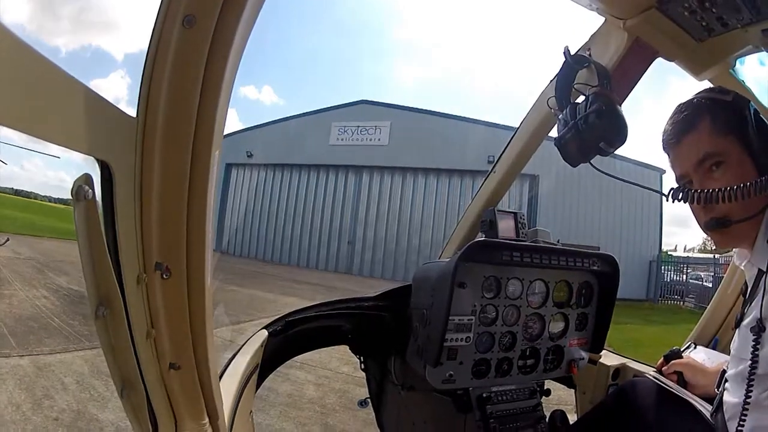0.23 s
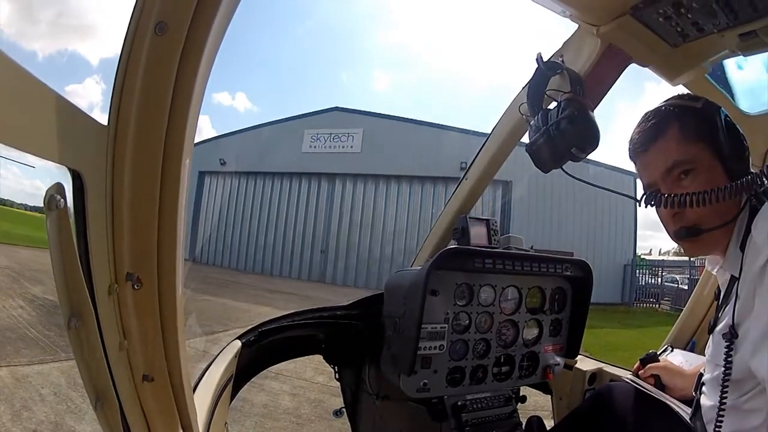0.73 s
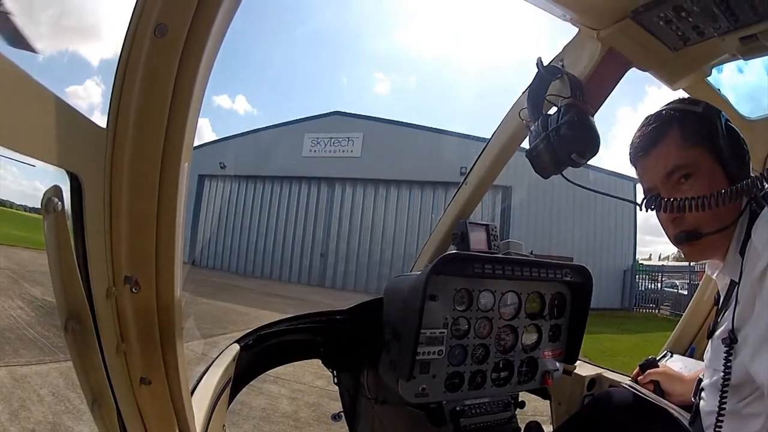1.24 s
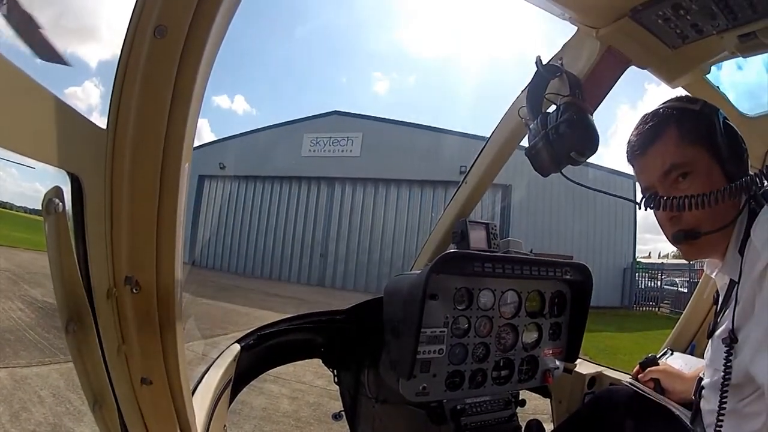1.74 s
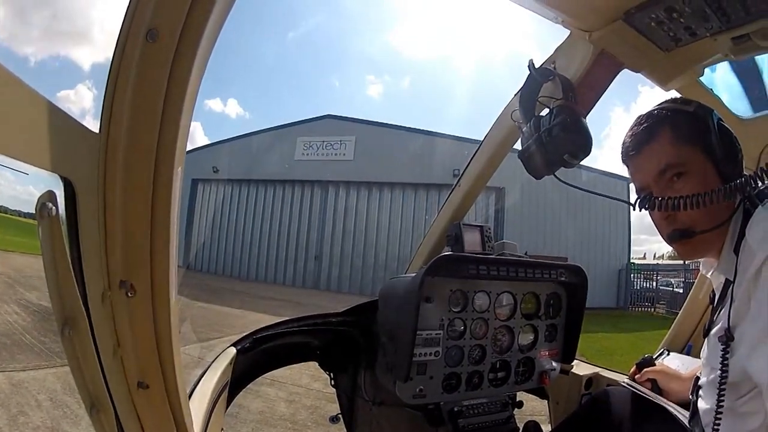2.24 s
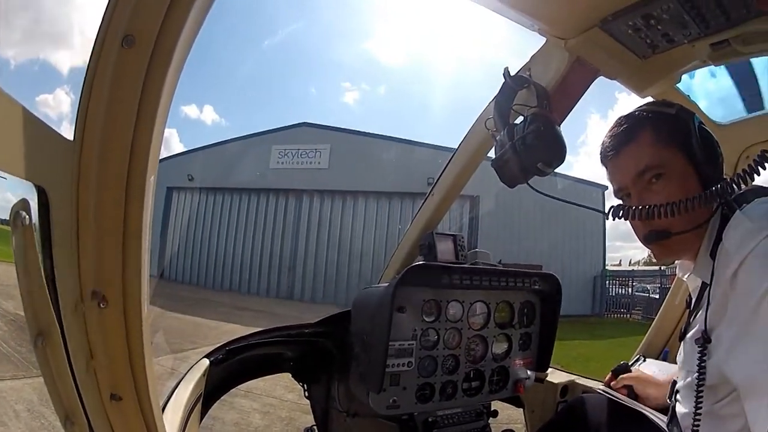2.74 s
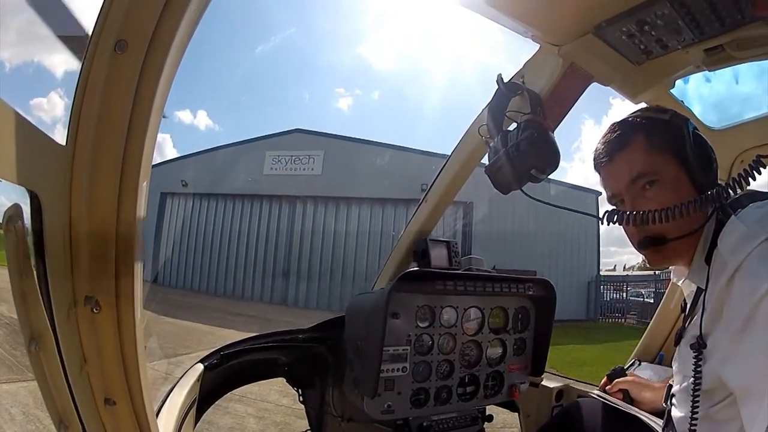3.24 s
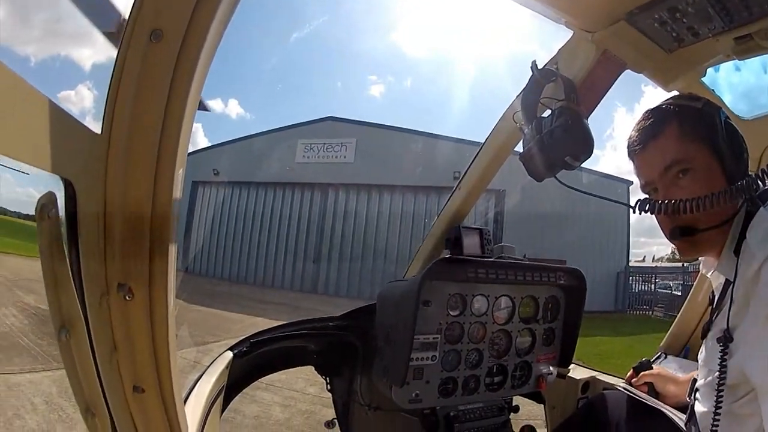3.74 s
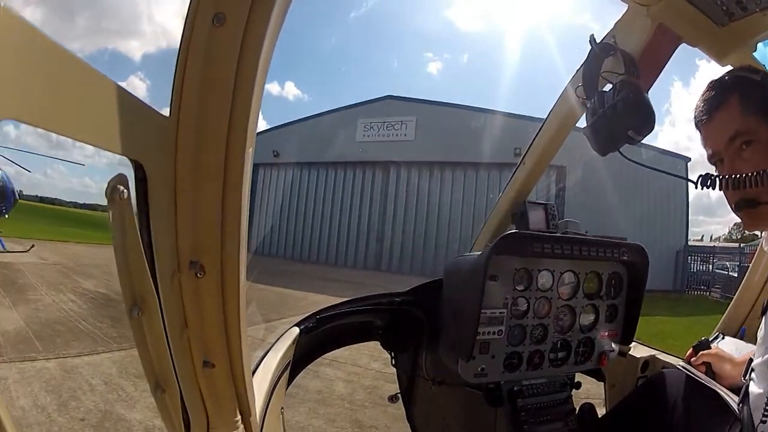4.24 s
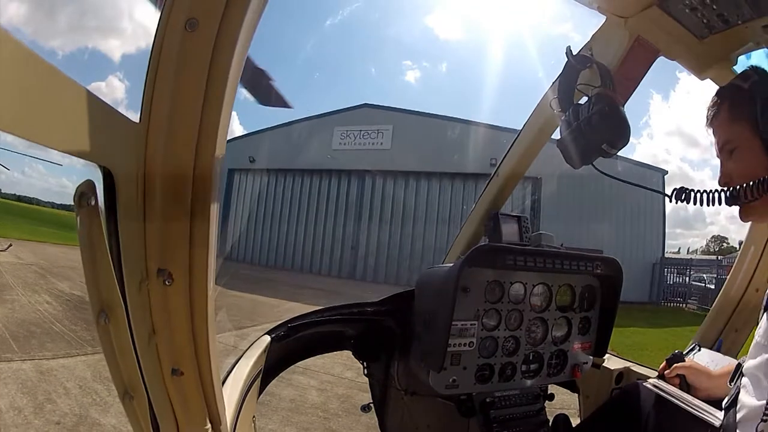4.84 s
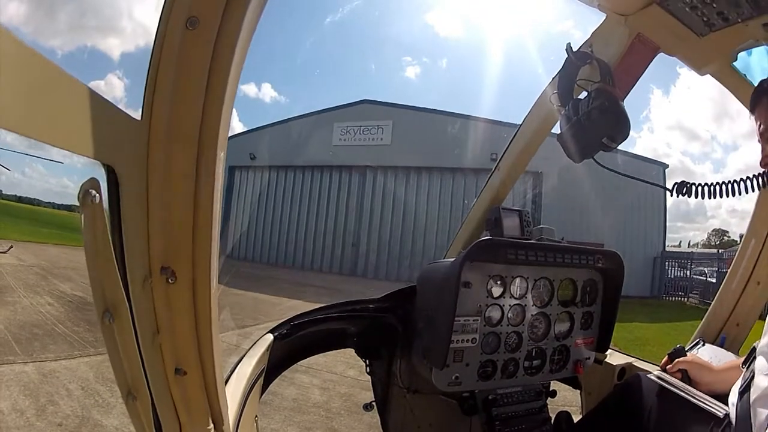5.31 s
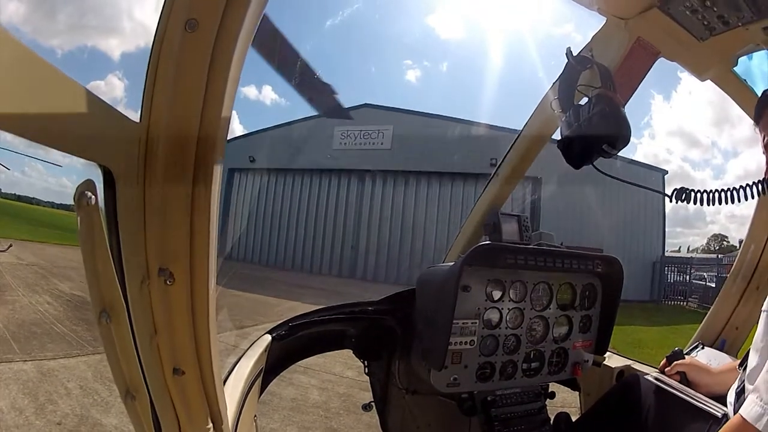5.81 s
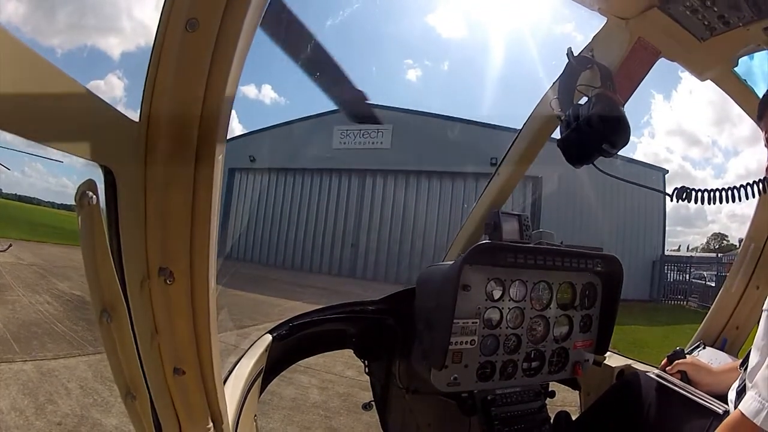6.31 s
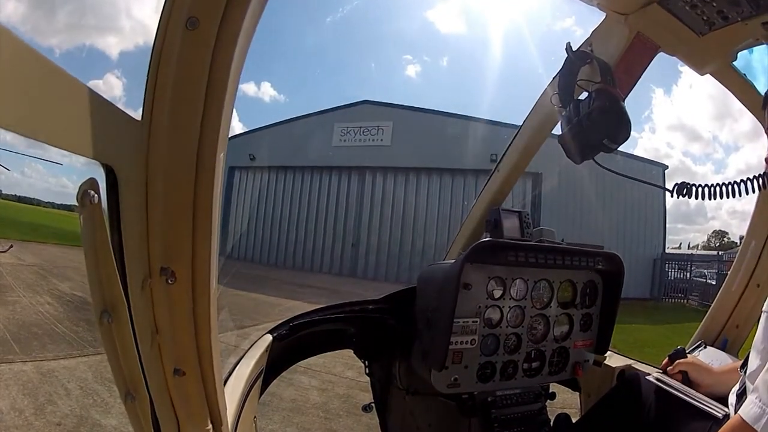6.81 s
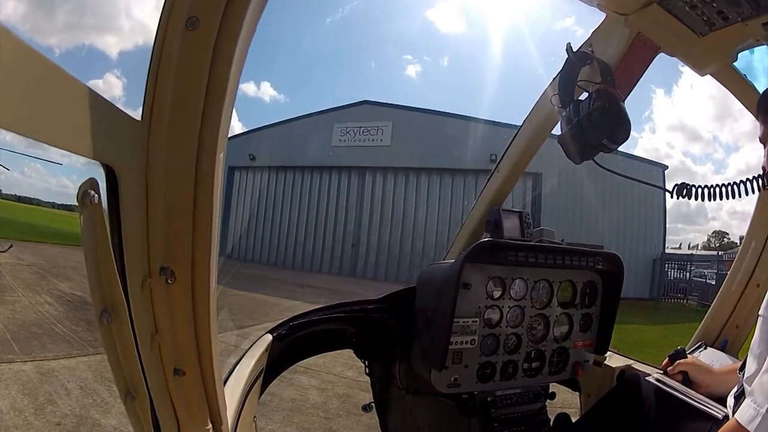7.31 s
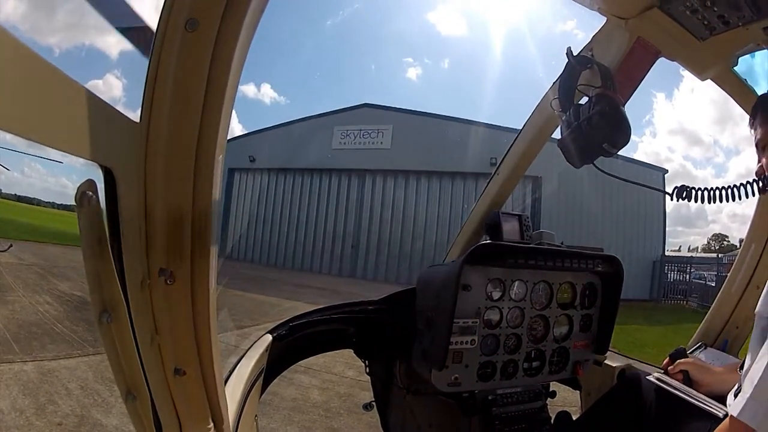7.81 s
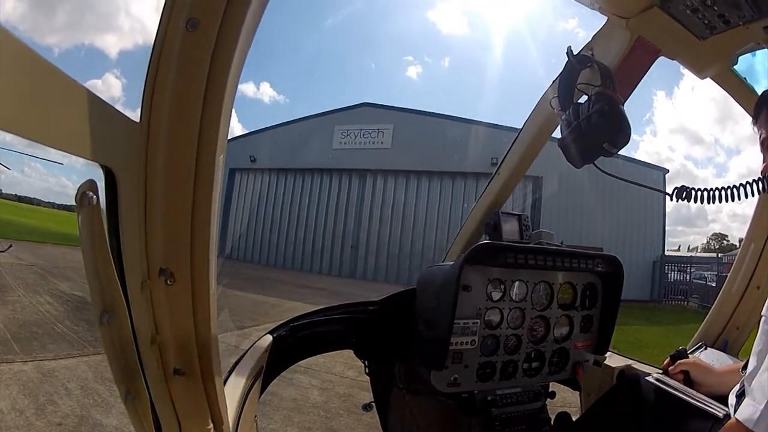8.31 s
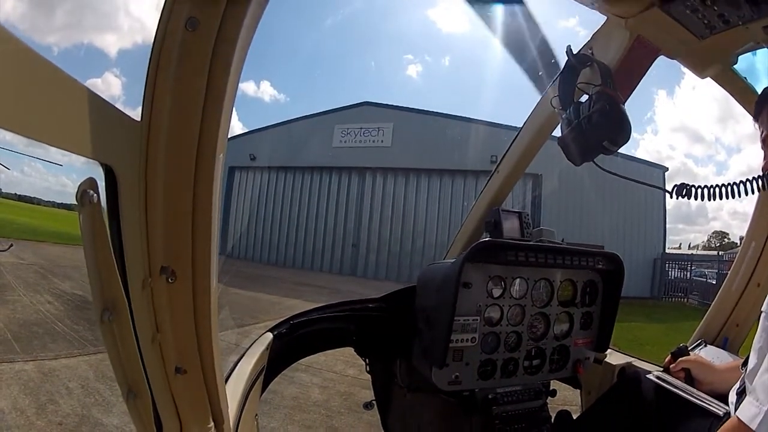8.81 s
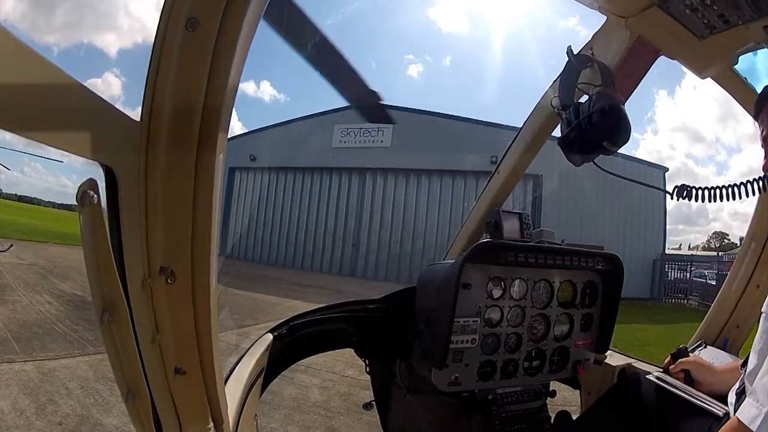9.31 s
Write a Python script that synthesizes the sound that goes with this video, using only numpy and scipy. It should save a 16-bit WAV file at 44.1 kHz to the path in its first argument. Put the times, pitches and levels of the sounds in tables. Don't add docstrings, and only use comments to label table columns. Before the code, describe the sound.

A helicopter idles on the ground, loud booming cabin drone and turbine whine, hard camera knocks, then abruptly quieter as the pitch slowly climbs.

```python
import sys
import numpy as np
from scipy import signal
from scipy.fft import rfft, irfft, next_fast_len
from scipy.io import wavfile
from scipy.ndimage import uniform_filter1d, map_coordinates

SR = 44100
rng = np.random.default_rng(int(sys.argv[2]) if len(sys.argv) > 2 else 0)


def voltage_ratio(decibels):
    exponent = np.asarray(decibels, float) / 20
    return 10 ** exponent


def dump_mix(stems):
    frames = np.atleast_2d(stems).T
    limited = np.clip(frames, -1, 1)
    pcm = np.round(limited * 32767).astype(np.int16)
    wavfile.write(sys.argv[1], SR, pcm)


N = 421155


def unit(x):
    return x / np.sqrt(np.mean(x ** 2) + 1e-20)


def curves(rows):
    s, *columns = np.transpose(rows)
    return [np.interp(np.arange(N) / SR, s, column) for column in columns]


def wobble(rate):
    knots = rng.standard_normal(int(N * rate / SR) + 4)
    at = np.arange(0, N + 64, 64)
    return np.interp(np.arange(N), at, map_coordinates(knots, [at * rate / SR]))


def filtered(x, response):
    size = next_fast_len(len(x) + 8192)
    return irfft(rfft(x, size) * response(np.fft.rfftfreq(size, 1 / SR)), size)[:len(x)]


def noise(response):
    return unit(filtered(rng.standard_normal(N), response))


def tone(phase, db, blur, waver_db):
    drift = wobble(10)
    angle = phase + blur * drift[::-1] + rng.uniform(0, 2 * np.pi)
    return np.sqrt(2) * voltage_ratio(db + waver_db * drift) * np.sin(angle)


def resonances(modes):
    return lambda f: sum((-1) ** k * voltage_ratio(db) * 1j * f * w / (c * c - f * f + 1j * f * w)
                         for k, (c, w, db) in enumerate(modes))


def cabin(modes):
    return lambda f: np.sqrt(sum(np.abs(resonances([mode])(f)) ** 3 for mode in modes))


def points(spectrum):
    f, db = np.transpose(spectrum)
    return lambda hz: voltage_ratio(np.interp(np.log(hz + 1), np.log(f + 1), db, -120, -120))


def blend(contact, shape, pair):
    on_frame = np.sqrt(contact) * noise(shape(pair[0]))
    return on_frame + np.sqrt(1 - contact) * noise(shape(pair[1]))


# t/s, contact (0-1)
LIFT_OFF = [
    (4.628, 0.98),
    (4.636, 0),
]


def frame_contact():
    return np.clip(curves(LIFT_OFF)[0], 0, 1)


# t/s, gear mesh f/Hz
MESH_SPEED = [(0, 1234.2), (6.2, 1234.1), (6.5, 1235.3), (6.8, 1238), (7.1, 1242.6), (7.7, 1254),
              (8, 1259.4), (8.3, 1263.4), (8.6, 1265.5), (9, 1265.8), (9.55, 1265.2)]


def mesh_hz():
    return curves(MESH_SPEED)[0]


def mesh_phase():
    return 2 * np.pi * np.cumsum(mesh_hz()) / SR


# t/s, level/dB
BUFFETING = [(0, 6.5), (.5, 4.5), (1.12, 5), (1.3, 0.5), (2.4, 2), (3.3, -1), (3.75, 1), (3.83, 7),
             (3.98, 7), (4.06, 3.5), (4.3, 0), (4.44, 1.5), (4.7, 2), (5.5, 3), (6.4, -0.5), (6.8, 0),
             (9.3, 1), (9.55, 2.5)]


def buffeting_db():
    return curves(BUFFETING)[0]


RESEATED = (2.61, 3.9)


def placed(contact, first_db, second_db, third_db, idle_db, full_db):
    speed = mesh_hz()
    throttle = (speed - speed.min()) / np.ptp(speed)
    a, b = RESEATED
    seat_db, = curves([(a, first_db), (a + .05, second_db), (b, second_db), (b + 0.14, third_db)])
    return contact * seat_db + (1 - contact) * (idle_db + throttle * (full_db - idle_db))


def settling():
    return np.exp(-(np.arange(N) / SR / 0.42) ** 2)


# f/Hz, width/Hz
PANEL_MODES = [(613.5, 2.5), (618, 4), (1246, 7), (1823, 16), (3662, 26), (4777, 19)]
PANEL_LIFT = [6, 5, -4, 8, 6.5, -8]


def panel_db(line_hz):
    return sum(db * np.exp(-((line_hz - hz) / width) ** 2)
               for (hz, width), db in zip(PANEL_MODES, PANEL_LIFT) if hz / 2 < line_hz[0] < hz)


def wall_echo_db(contact, whine_hz):
    speed = mesh_hz()
    share = np.clip(1.35 - .87 * (speed.max() - speed) / np.ptp(speed), 0, .99)
    echo = (1 - contact) * share * np.exp(2j * np.pi * (whine_hz - 4774) / 36.9)
    return 20 * np.log10(np.abs(1 - echo) / (1 + np.abs(echo)))


MAIN_RATIO = [
    1,
    .07693,
    .4951,
    1.4613,
    2.9226,
    3.8456,
]
# first, second, third seat, free at idle, free at full speed level/dB
MAIN_LEVEL = [
    (-35.5, -34, -33, -44, -41),
    (-23, -24.5, -18.5, -43, -36),
    (-43, -36.5, -43.5, -58.5, -61),
    (-44, -41.5, -71, -58.5, -58.5),
    (-55.5, -65, -56, -62.5, -61.5),
    (-50.5, -46, -45.5, -61.5, -52),
]
MAIN_SETTLE = [5, -1, -5, 0, 4, 0]


def main_lines(contact):
    speed, turn = mesh_hz(), mesh_phase()
    levels = []
    for ratio, row, settle_db in zip(MAIN_RATIO, MAIN_LEVEL, MAIN_SETTLE):
        db = placed(contact, *row) + (1 - contact) * panel_db(ratio * speed)
        levels.append(db + settle_db * settling())
    levels[1] += 0.23 * buffeting_db()
    levels[-1] += wall_echo_db(contact, MAIN_RATIO[-1] * speed)
    return sum(tone(ratio * turn, db, blur=.15, waver_db=.6) for ratio, db in zip(MAIN_RATIO, levels))


# ratio to the mesh, level/dB on the frame, level/dB free
WEAK_GEARS = [(.0101, -33, -48), (.1961, -39, -52), (.2358, -36, -54), (.2613, -43, -57), (.539, -51, -66),
              (.7576, -51, -62), (.9799, -47, -57), (.9899, -58, -60), (1.0102, -53, -64),
              (1.0204, -52, -58), (1.3848, -54, -80), (1.4413, -53, -63), (1.4513, -60, -66),
              (1.5153, -62, -63), (1.9229, -60, -71), (1.9565, -57, -80), (2.0104, -59, -74),
              (2.051, -63, -76), (2.4714, -66, -73), (2.846, -62, -82), (3.42, -66, -81),
              (4.2719, -71, -90)]


def weak_lines(contact):
    turn = mesh_phase()
    return sum(tone(ratio * turn, free_db + contact * (frame_db - free_db), blur=0.28, waver_db=2.0)
               for ratio, frame_db, free_db in WEAK_GEARS)


# first, second, third seat, free at idle, free at full speed level/dB
ROAR_LEVEL = [
    (-22.5, -23, -24.5, -34, -34),
    (-25, -24, -23.5, -33.5, -30.5),
    (-38.5, -38.5, -40.5, -53, -53),
    (-40.5, -40.5, -42, -57, -56.5),
]


def roar_levels(contact):
    shake_db = buffeting_db()
    shares = (1.21, 1, 0.067, 0)
    return [placed(contact, *row) + share * shake_db for row, share in zip(ROAR_LEVEL, shares)]


# f/Hz, width/Hz, level/dB
BOOM_MODES = [
    [(28, 8.5, -13.5), (52.3, 14.4, -1.5), (59.4, 6.3, -3.5), (82.5, 11, -4), (121, 32, -12.5)],
    [(53.5, 15, -7), (64, 8, -21), (80, 8.7, -24), (110, 30, -19)],
]
# f/Hz, width/Hz, level/dB
DRONE_MODES = [
    [(158.4, 30, -7), (179.5, 28, 1), (207.5, 38, -10)],
    [(160.6, 25, -12), (191.2, 14, -6), (210.7, 4.6, -6.5)],
]


def cabin_booms(contact, boom_db, drone_db):
    boom = voltage_ratio(boom_db + 2.0 - 2 * settling()) * blend(contact, cabin, BOOM_MODES)
    drone = voltage_ratio(drone_db + 2.0 + 4 * settling()) * blend(contact, cabin, DRONE_MODES)
    return boom + drone


# f/Hz, width/Hz, level/dB
DUCT_MODES = [
    [(950, 73, 0.5), (1875, 120, 0), (3030, 76, -2.5)],
    [(959, 40, 3), (1830, 45, -12), (3090, 61, -3.5)],
]
# f/Hz, level/dB per Hz
BODY_COLOUR = [
    [(150, -39), (250, -4), (299, -1.5), (350, -3.5), (491, -11), (615, -6.5), (823, -18.5), (949, -14), (1110, -14), (1200, -7.5), (1240, -16.5), (1300, -13), (1500, -44.5), (1950, -59), (3300, -120)],
    [(150, -48), (250, -32), (286, -8.5), (469, -15), (619, -11), (775, -24.5), (949, -20.5), (1050, -23), (1150, -16), (1250, -12), (1310, -15), (1350, -18.5), (1500, -46), (1950, -62), (3300, -120)],
]
# f/Hz, level/dB per Hz
HISS_COLOUR = [
    [(850, -51), (1450, -12.5), (1620, -13.5), (1750, -5.5), (1850, 0.5), (2600, -9), (3050, -13), (3350, -18), (3640, -12.5), (4030, -22), (4510, -21), (4590, -14.5), (4930, -24.5), (5010, -19), (5950, -28), (7740, -78), (13100, -120)],
    [(850, -49), (1450, -16.5), (1700, -11), (1840, -3.5), (2150, -10), (3140, -16), (3350, -23), (3580, -12), (3800, -16), (3960, -22), (4510, -24.5), (4700, -20.5), (4930, -23), (5100, -23.5), (5950, -28), (7740, -79), (13100, -120)],
]


def airflow(contact, body_db, hiss_db):
    blades = mesh_phase() / 100
    flutter = wobble(18) + 0.79 * np.sin(blades) + .7 * np.sin(2 * blades)
    whistle = voltage_ratio(hiss_db - 2.5 + 2.2 * flutter) * blend(contact, cabin, DUCT_MODES)
    body = voltage_ratio(body_db + 6.0 + 1.0 * flutter) * blend(contact, points, BODY_COLOUR)
    hiss = voltage_ratio(hiss_db + 4.0 + 0.5 * flutter) * blend(contact, points, HISS_COLOUR)
    return whistle + body + hiss


# multiple of the rotor speed, level/dB on the frame
PUMP_SIDE_LINES = [(2, -49.5), (4, -52), (5, -56), (7, -53)]


def pump_flutter(contact):
    turn, rotor = mesh_phase(), .005
    out = 0
    for order, db in PUMP_SIDE_LINES:
        free_db = -18 * np.sqrt(order / 2)
        phase = (MAIN_RATIO[3] + rotor * round(order)) * turn
        out = out + tone(phase, db + (1 - contact) * free_db, blur=0.36, waver_db=-2.0)
    return out


# f/Hz, width/Hz, level/dB
CASE_RINGS = [
    (380, 880, -9),
    (4940, 230, -38),
]
# t/s, peak level/dB, rattle/ms, low ring f/Hz, high ring f/Hz
CASE_CLICKS = [(0.136, -23, 6.1, 1100, 4750), (.143, -17, 3.5, 1000, 3000), (2.4697, -3, 4.2, 2000, 5600),
               (2.501, -9, 4.1, 1720, 2420), (2.507, -17, 3.5, 1500, 2500), (3.827, -21.5, 5, 2000, 2500),
               (3.860, -3.5, 2.2, 1330, 2520), (3.8774, 5, 3.4, 950, 2410), (3.904, -8.5, 3.6, 1330, 3540),
               (3.967, -10.5, 4.1, 1070, 2660), (4.001, -20, 7.7, 1200, 2580),
               (4.432, -6.5, 1.8, 430, 2200), (4.440, -20, 4.1, 1200, 2300), (4.487, -22, 9.6, 2300, 3200),
               (4.573, -23, 3.9, 1800, 3800), (4.618, -1.5, 1.9, 1230, 1870), (4.638, -16, 4.9, 1060, 2300),
               (4.822, -26, .9, 500, 1100), (8.903, -30.5, 2.2, 1600, 3600)]


def case_click(t, ms, low_hz, high_hz):
    length = max(ms, .3)
    rattle = rng.standard_normal(len(t)) * (1 - np.exp(-t / 0.000063))
    rattle *= np.exp(-(t / (length / 1000)) ** 2)
    spectrum = rfft(rattle)
    rattle = irfft(spectrum / uniform_filter1d(np.abs(spectrum), size=40), len(t))
    rattle *= np.exp(-(t / (length / 500)) ** 4)
    rings = resonances([CASE_RINGS[0], (low_hz, 450, -1.5), (high_hz, 800, 0.1), CASE_RINGS[1]])
    ring = filtered(rattle, lambda f: rings(f) * (1 / (1 + 1j * f / 4200) ** 2))
    thump_db = -10 * np.log2(low_hz / 600)
    thump = 1.36 * np.sin(2 * np.pi * 140 * t) * voltage_ratio(-60 * t / 0.02)
    return ring / np.abs(ring).max() + voltage_ratio(thump_db) * thump


def clicks():
    out, t = np.zeros(N + SR), np.arange(SR // 10) / SR
    for s, db, ms, low_hz, high_hz in CASE_CLICKS:
        out[round(s * SR):][:len(t)] += voltage_ratio(db) * case_click(t, ms, low_hz, high_hz)
    return out[:N]


# t/s, f/Hz, level/dB, t60/s
SNAP_RINGS = [(2.4702, 1110, -4, .028), (2.4698, 2470, -3, .045), (2.4702, 2250, -4, .045),
              (2.4705, 3620, -8, .025), (2.4705, 560, -12, .03), (2.4778, 210, -7, .038)]


def hard_snap():
    out, t = np.zeros(N + SR), np.arange(SR // 10) / SR
    for s, hz, db, t60 in SNAP_RINGS:
        plate = 300 <= hz <= 3000
        damped = np.exp(-(s + t - SNAP_RINGS[0][0]) ** 4 / .0065 ** 4) if plate else 1
        out[round(s * SR):][:len(t)] += damped * voltage_ratio(db - 60 * t / t60) * np.sin(2 * np.pi * hz * t)
    return out[:N]


# t/s, level/dB, hold/s, recovery/s
GAIN_DUCKS = [
    (2.476, -19, 0.02, 0.13),
    (3.878, -9.5, 0.0078, 0.093),
]


def gain_control_db():
    return sum(curves([(s - .002, 0), (s + 0.014, db), (s + 0.0022 + hold, db),
                       (s + 0.0034 + hold + back, 0)])[0] for s, db, hold, back in GAIN_DUCKS)


def scene():
    contact = frame_contact()
    boom_db, drone_db, body_db, hiss_db = roar_levels(contact)
    machine = main_lines(contact) + weak_lines(contact)
    machine += cabin_booms(contact, boom_db, drone_db) + airflow(contact, body_db, hiss_db)
    machine += pump_flutter(contact)
    return (voltage_ratio(gain_control_db()) * machine + clicks() + hard_snap())[None]


def band_limit(x):
    return signal.sosfilt(signal.butter(12, 16440, fs=SR, output="sos"), x)


def record(dry):
    coarse_hz, held, top_hz = 12000, 4, 15280
    clipped = dry[0] / (1 + np.abs(dry[0] / .97) ** 8) ** (1 / 8)
    guard = filtered(clipped, lambda hz: np.cos(np.pi / 2 * np.clip((hz - 5000) / 1500, 0, 1)) ** 1.5)
    margin = SR // 10
    wide = np.pad(guard, margin, "reflect")
    fine = signal.resample(wide, held * round(len(wide) * coarse_hz / SR))
    steps = signal.resample(np.repeat(fine[::held], held), len(wide))
    limited = filtered(steps[margin:][:N], lambda hz: np.clip((top_hz + 120 - hz) / 200, voltage_ratio(-52), 1))
    return band_limit(limited[None])


dry = scene()
out = record(dry)
dump_mix(out)
```